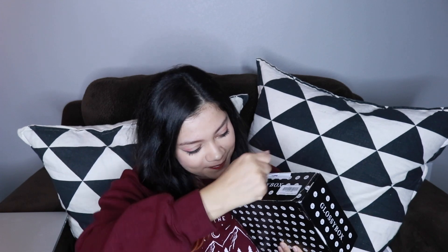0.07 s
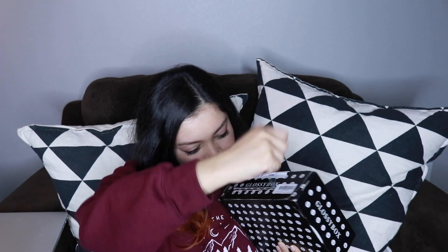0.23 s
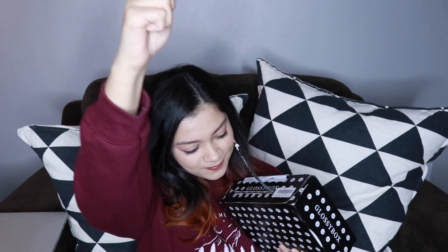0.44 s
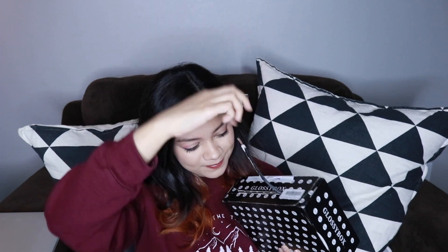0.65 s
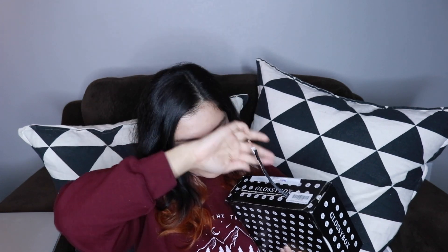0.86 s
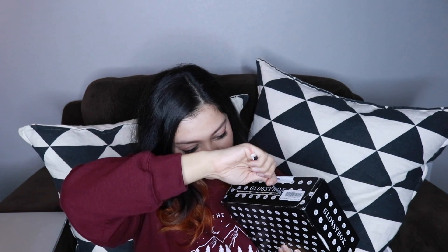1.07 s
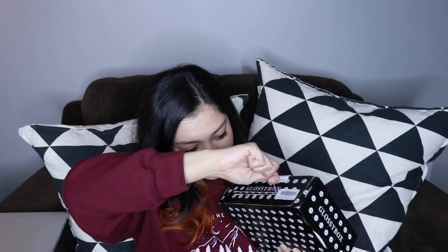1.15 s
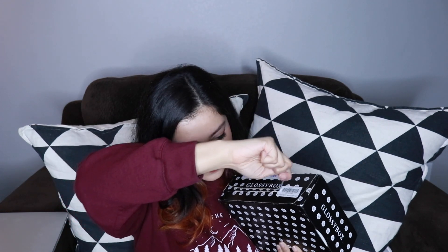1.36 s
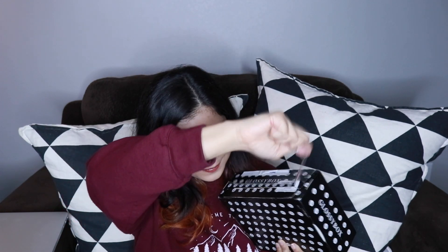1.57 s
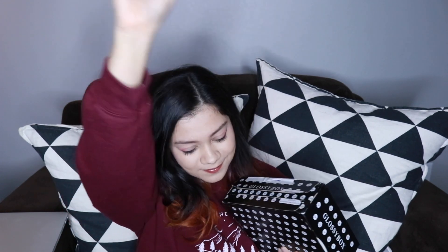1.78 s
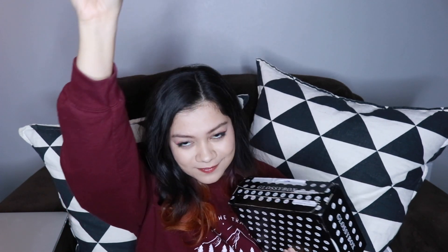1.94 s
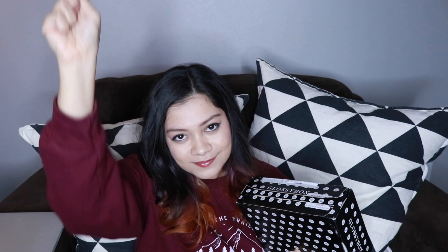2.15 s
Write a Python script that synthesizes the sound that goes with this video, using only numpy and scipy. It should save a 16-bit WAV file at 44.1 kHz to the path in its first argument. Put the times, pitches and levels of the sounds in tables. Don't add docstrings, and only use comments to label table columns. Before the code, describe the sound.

Corrugated cardboard box torn open along its pull strip in two loud, crackling, overloaded yanks

```python
import sys
import numpy as np
from scipy import signal
from scipy.fft import rfft, irfft
from scipy.io import wavfile

SR = 44100
rng = np.random.default_rng(int(sys.argv[2]) if len(sys.argv) > 2 else 0)


def persist_wave(psi):
    counts = np.round(np.clip(psi, -1, 1) * 32767).astype(np.int16)
    wavfile.write(sys.argv[1], SR, np.atleast_2d(counts).T)


def voltage_ratio(decibels):
    exponent = np.asarray(decibels, float) / 20
    return 10 ** exponent


N = 97328


def rms_one(x):
    return x / np.sqrt(np.mean(x ** 2) + 1e-20)


def in_time(rows, fade_s):
    s, *columns = np.transpose(rows)
    t = np.arange(N) / SR
    out = [np.interp(t, s, column) for column in columns]
    outside_s = np.maximum(s[0] - t, 0) + np.maximum(t - s[-1], 0)
    out[0] = out[0] - 20 * outside_s / fade_s
    return out


def at_hz(points, hz):
    table_hz, value = np.transpose(points)
    return np.interp(np.log(hz), np.log(table_hz), value)


def coloured(x, spectrum):
    log_gain = at_hz(spectrum, np.arange(1, 2050) * SR / 4096) * np.log(10) / 20
    cepstrum = irfft(log_gain)
    cepstrum[1:2048] *= 2
    cepstrum[2049:] = 0
    kernel = irfft(np.exp(rfft(cepstrum)))[:2048]
    return signal.fftconvolve(x, kernel / np.sqrt(np.sum(kernel ** 2)))[:N]


def drift(rate_hz):
    r = np.exp(-2 * np.pi * rate_hz / SR)
    settle = 9000
    slow = signal.lfilter([1], [1, -2 * r, r * r], rng.standard_normal(N + settle))
    return rms_one(slow[settle:])


def ring(x, hz, t60):
    r, w = voltage_ratio(-60 / (t60 * SR)), 2 * np.pi * hz / SR
    return signal.lfilter([0, np.sin(w)], [1, -2 * r * np.cos(w), r * r], x + 1e-18)


def grains(per_s, spread_db):
    sizes = voltage_ratio(spread_db * np.minimum(rng.exponential(1, N), 4)) * rng.choice([-1, 1], N)
    return rms_one(sizes * (rng.random(N) < per_s / SR))


def burst(s, length_s):
    t = np.arange(N) / SR - s
    return (t > 0) * np.minimum(t / 0.0004, 1) * np.exp(-np.maximum(t, 0) / max(length_s, 1e-4))


def run_in(body, x):
    lead = int(0.25 * SR)
    return body(np.concatenate([x[:lead][::-1], x]))[lead:]


def tearing():
    # start_s, pull_db, fibre_db
    yank_1 = [
        (0.0, 1.5, -10.5),
        (0.09, -2.5, -16),
        (0.152, -9, -6),
        (0.172, -9, -8),
        (0.208, -8.5, -9),
        (0.218, -5.5, -3),
        (0.266, -10, -10.5),
        (0.31, -11.5, 1),
    ]
    yank_2 = [
        (1.435, -36, 1.5),
        (1.465, -17, 2),
        (1.487, -12, -4),
        (1.515, -20.5, 6),
        (1.529, -11.5, -6),
        (1.641, -10, -6.5),
        (1.647, -21, -24),
        (1.66, -12.5, -8.5),
    ]
    # pitch_hz, level_db (per Hz)
    fibre_colour = [(300, -12.5), (600, 3), (1300, 0.5), (2000, -9.5), (2700, -13.5), (4000, -9.5),
                    (5200, -16.5), (15800, -25.5)]
    # pitch_hz, level_db (per Hz)
    card_colour = [(300, -3), (900, -5), (1700, -4.5), (2600, -9), (4000, -11), (5500, -20), (15800, -23)]
    tab_starts = [.020, .041, .137, .165, .216, .230, 1.329, 1.351, 1.364, 1.399, 1.418, 1.437, 1.450,
                  1.631]
    # peak_db, box_share_db, length_s
    tab_rows = [(-16, 11, 0.0046), (2, -7, 0.0053), (-12.5, -14, 0.012), (-14.5, -38, .004),
                (-13.5, 8, 0.007), (-20, 9, 0.006), (-25.5, -8, .018), (-13, 1.5, 0.0038),
                (-28, -48, 0.021), (-16, 1.5, 0.0053), (-31, -2, 0.0235), (-18, 4.5, 0.011),
                (-18, 11, 0.0066), (-5.5, -13, 0.012)]
    clump_db, clumps_per_s = 2.2, 90
    drum_db, crackle_db, tab_db = 6, 7, 1.5
    let_go_s, ring_out_s = 0.0033, 0.024
    breaks = rms_one(grains(8000, 2.5) * voltage_ratio(clump_db * drift(clumps_per_s)))
    force, crackle = np.zeros(N), np.zeros(N)
    for yank in (yank_1, yank_2):
        pull_db, fibre_db = in_time(yank, let_go_s)
        begun = np.arange(N) >= yank[0][0] * SR
        force += voltage_ratio(in_time(yank, ring_out_s)[0] + drum_db) * begun
        crackle += voltage_ratio(pull_db + fibre_db + crackle_db)
    wall_limit = 0.78
    walls = np.tanh(wall_limit * rms_one(run_in(box, breaks)))
    drum = force * rms_one(walls)

    tabs, knocks = np.zeros(N), np.zeros(N)
    tab_noise = grains(9800, 0.98)
    for s, (peak_db, share_db, length_s) in zip(tab_starts, tab_rows):
        release = burst(s, length_s) * tab_noise
        tabs += voltage_ratio(peak_db + tab_db) * release
        knocks += voltage_ratio(peak_db + share_db + tab_db) * release
    return drum + box(knocks) + coloured(crackle * breaks, fibre_colour) + coloured(tabs, card_colour)


def box(force):
    # pitch_hz, level_db, t60_s
    modes = [(167.4, -25, 0.23), (222.3, -1.5, 0.077), (259.7, 4, 0.11), (307.9, 3, 0.11), (370, -4, 0.058),
             (417.7, -5, 0.085), (519, 0, 0.065), (706, -8.5, 0.017), (722, -15, 0.12), (941, -18.5, 0.12),
             (1168, -8.5, 0.052), (1566, -23, 0.09), (1628, -13, 0.014), (1998, -11, 0.09)]
    energy = sum(voltage_ratio(2 * db) * t60 for hz, db, t60 in modes) * SR / (12 * np.log(10))
    out = 0
    for k, (hz, db, t60) in enumerate(modes):
        out = out + (-1) ** k * voltage_ratio(db) * ring(force, hz, t60)
    return out / np.sqrt(energy)


def snaps():
    snap_starts = [.3050, .3080, 1.6465, 1.6515, 1.6480]
    # level_db, ring_start_hz, ring_end_hz, length_s
    snap_rows = [
        (11.7, 640, 2600, 0.0045),
        (2.6, 1800, 686, 0.015),
        (13.6, 3900, 2860, 0.0078),
        (3.6, 2400, 1700, .013),
        (2.5, 4500, 3000, 0.017),
    ]
    rough_db, crack_db = 4.5, -17
    out, noise, flutter = np.zeros(N), rng.standard_normal(N), drift(900)
    for s, (db, start_hz, end_hz, length_s) in zip(snap_starts, snap_rows):
        u = np.clip((np.arange(N) / SR - s) / length_s, 0, 1)
        glide = length_s * (start_hz * u + (end_hz - start_hz) * u ** 2 / 2)
        cycles = glide + 0.11 * flutter[::-1]
        swing = np.minimum(8 * u, 1) * (1 - u) ** 1.3 * voltage_ratio(rough_db * flutter)
        whip = swing * np.sin(2 * np.pi * cycles)
        out += voltage_ratio(db) * (whip + voltage_ratio(crack_db) * burst(s, length_s / 2) * noise)
    return out


def fingers():
    # start_s, level_db
    slides = [
        (.99, -69),
        (1.003, -39),
        (1.03, -68),
        (1.055, -49),
        (1.075, -45),
        (1.12, -48.5),
        (1.135, -67.5),
        (1.26, -46.5),
        (1.325, -51),
    ]
    # pitch_hz, level_db (per Hz)
    skin_colour = [(150, -1), (350, 6.5), (900, -7), (2000, -11), (4000, -6), (5500, -17), (9000, -13),
                   (15800, -14.5)]
    # start_s, peak_db, pitch_hz, thud_db
    ticks = [(0.669, -36, 1700, -56), (.742, -26, 1800, -47), (0.821, -33.5, 11000, -70),
             (0.941, -42, 920, -50), (1.031, -32, 8800, -66), (1.091, -23, 10000, -58),
             (1.143, -13.5, 2360, -41.5), (1.167, -28, 10000, -61), (1.21, -33.5, 7200, -66),
             (1.224, -43, 6000, -57.5), (1.246, -39, 4000, -52), (1.271, -33, 7900, -51.5),
             (1.28, -32, 8900, -48), (1.305, -39.5, 9250, -60), (1.78, -16, 11100, -47),
             (1.795, -37.5, 12300, -54), (2.072, -36, 8100, -75.5), (2.106, -37, 9600, -64.5)]
    slide_db, uneven_db, tick_db, thud_gain_db = 3, 2.2, -1.5, 15
    level_db, = in_time(slides, 0.014)
    out = voltage_ratio(level_db + slide_db + uneven_db * drift(50)) * coloured(grains(9000, 2.5), skin_colour)
    thud, noise = np.zeros(N), rng.standard_normal(N)
    for s, db, hz, thud_db in ticks:
        band = signal.butter(2, [hz * 0.6, min(hz * 1.6, 18000)], "band", fs=SR, output="sos")
        out += voltage_ratio(db + tick_db) * signal.sosfilt(band, burst(s, 0.00094) * noise + 1e-18)
        thud += voltage_ratio(thud_db + thud_gain_db) * burst(s, 0.0035) * noise
    return out + box(thud)


def room(x):
    # pitch_hz, t60_s
    decay_times = [(100, 1), (260, 0.55), (700, 0.63), (1500, 0.8872), (2500, 0.77), (4000, 0.83),
                   (7000, 0.8569), (13000, 0.37)]
    # pitch_hz, level_db
    echo_colour = [(150, -13), (700, -3.5), (1800, -2), (2200, -6), (3100, -2), (4450, -1.5), (4900, -4),
                   (14000, -10)]
    room_db, first_echo_s, early_db, early_s = -9, 0.0018, 1.5, 0.03
    t = np.arange(SR) / SR
    edges = 70 * 2 ** np.arange(0, 8.1, 1 / 3)
    tail, white = 0, rng.standard_normal((2, SR))
    for k, (low, high) in enumerate(zip(edges, edges[1:])):
        sos = signal.butter(2, [low, high], "band", fs=SR, output="sos")
        band = signal.sosfilt(sos, white[k % 2])
        tail = tail + band * voltage_ratio(-60 * t / at_hz(decay_times, np.sqrt(low * high)))
    onset = np.clip(t / first_echo_s - 1, 0, 1)
    early = 1 + voltage_ratio(early_db) * np.exp(-t / early_s)
    tail = coloured(tail, echo_colour)[:SR] * onset * early / np.sqrt(SR / 20)
    return voltage_ratio(room_db) * signal.fftconvolve(x, tail)[:len(x)]


def room_air():
    # pitch_hz, level_db
    air_colour = [(35, -50), (60, -12), (677, -8), (760, -10), (1130, -14), (3080, -21.5), (3970, -16.5),
                  (5020, -31), (15700, -34.5)]
    return voltage_ratio(-46) * coloured(rng.standard_normal(N), air_colour)


def scene():
    near, whip = tearing() + fingers(), snaps()
    whip_to_room_db = -6
    echoes = run_in(room, near + voltage_ratio(whip_to_room_db) * whip)
    heard = near + whip + echoes + room_air()
    low_cut = signal.butter(4, 94, "high", fs=SR, output="sos")
    mono = signal.sosfilt(low_cut, heard)
    left_db, right_db, hiss_db = 0.5, -9, -79
    return mono * voltage_ratio(np.array([[left_db], [right_db]])) + voltage_ratio(hiss_db) * rng.standard_normal((2, N))


def band_limit(x):
    return signal.sosfilt(signal.butter(12, 15860, fs=SR, output="sos"), x)


def record(dry):
    clipped = np.clip(dry, -1, 1)
    top_cut = signal.ellip(8, 0.1, 35, 15830, fs=SR, output="sos")
    return band_limit(signal.sosfiltfilt(top_cut, clipped))


dry = scene()
out = record(dry)
persist_wave(out)
```